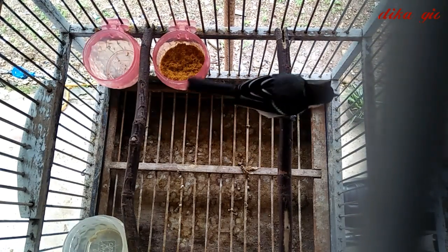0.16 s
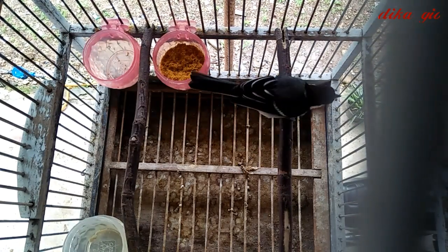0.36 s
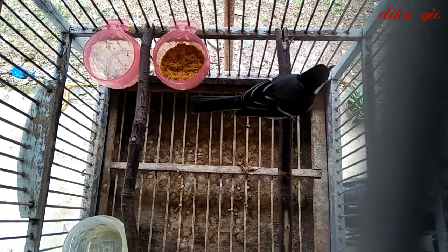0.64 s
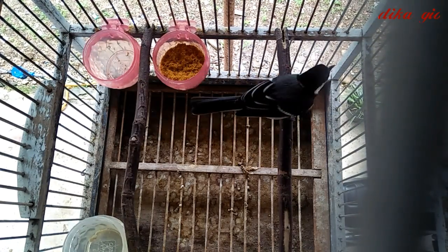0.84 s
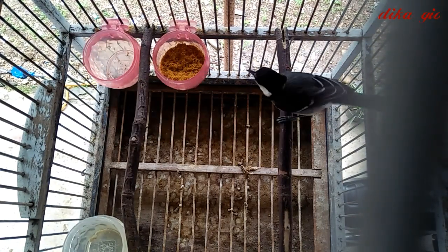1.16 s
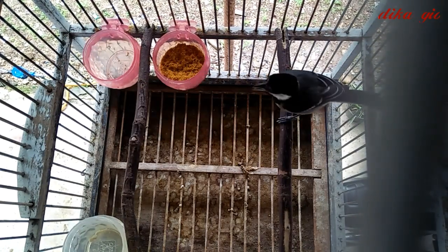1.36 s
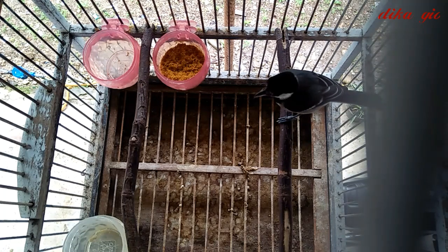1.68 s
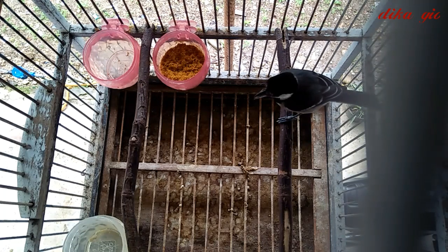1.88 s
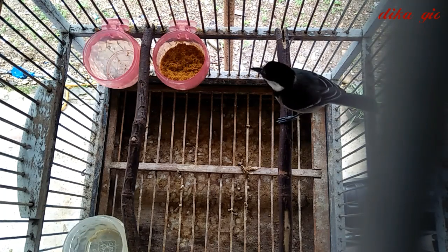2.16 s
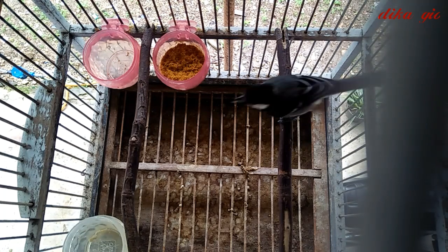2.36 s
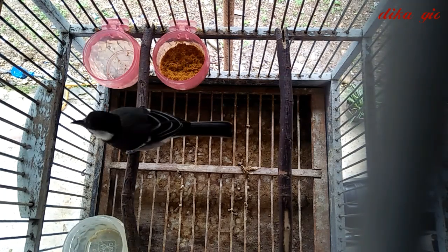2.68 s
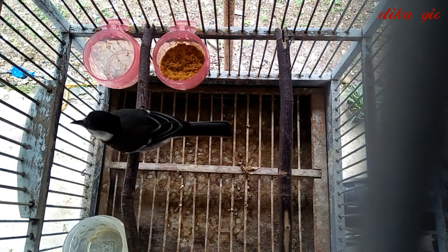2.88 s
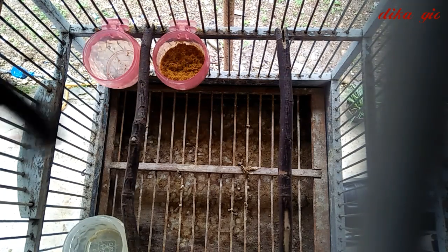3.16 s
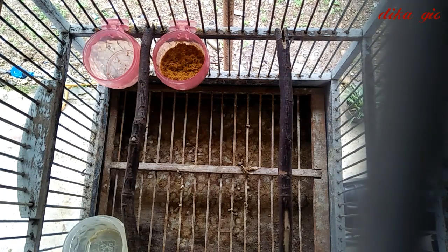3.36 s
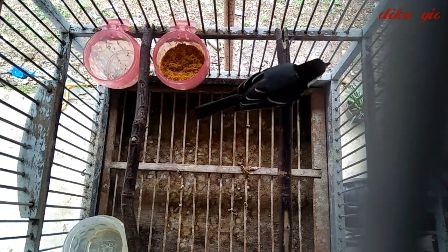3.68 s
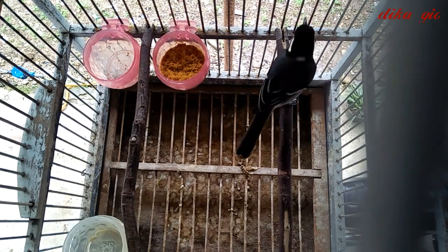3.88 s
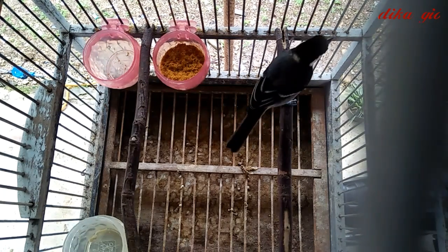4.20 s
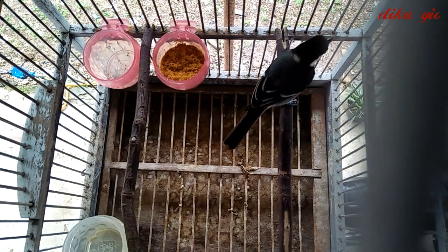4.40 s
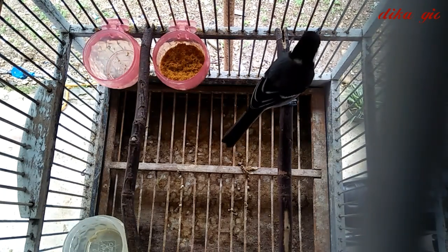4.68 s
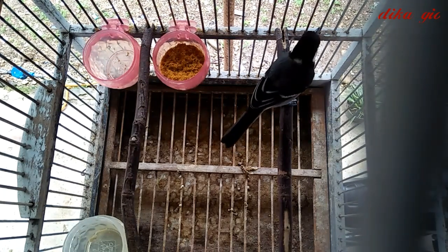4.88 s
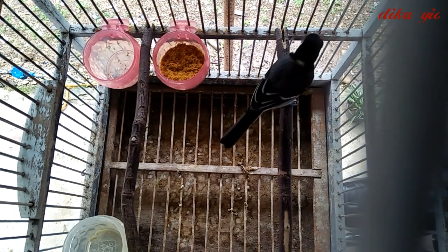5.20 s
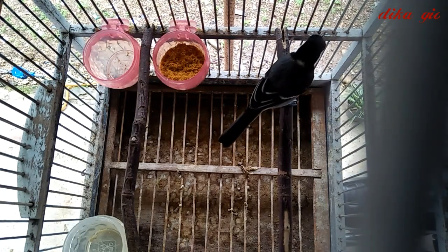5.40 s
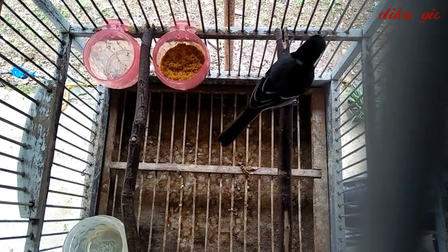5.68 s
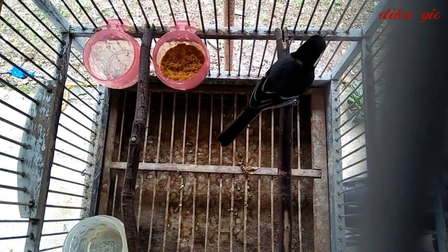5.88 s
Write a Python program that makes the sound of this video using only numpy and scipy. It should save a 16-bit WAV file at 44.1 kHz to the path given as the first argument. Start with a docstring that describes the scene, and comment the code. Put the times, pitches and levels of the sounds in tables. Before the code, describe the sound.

For the first 1.5 seconds there is only a faint murky bed of low rumble, dull wash and fluttering hiss, with soft hollow swells. At about 1.5 a small bird close by starts to sing loudly: a raspy onset into a slur rising from roughly 3.7 to 5 kHz, a thin whistle near 6 to 7 kHz at 1.75, two quick arched chips at 1.97 and 2.06, a sharp tick within the second, and another slur at 2.25. From 2.4 to 4.1 the quiet bed returns with faint ticks and hollow puffs. The second phrase begins at 4.15 with a thin whistle, then paired chips at 4.4, a raspy slur at 4.7, a softer-starting thin whistle at 4.9 and two last chips at 5.2 and 5.3. Notes leave a short ringing cage and room tail and faint mirror tones. Quiet hiss continues to 6.

```python
"""A small caged bird sings two phrases close by, its syrinx gliding near-sine whistles through three syllables:
a low slur that opens with a rasp, a thin high whistle, and a pair of arched chips that open with short rasps.
Reflections off the cage and room give the song a slightly ringing tail.
Shaped noise gives a faint murky background of rumble, dull wash and hiss, with soft hollow swells, sharp ticks
and brief fading bursts of hiss. Rate conversion by dropping samples puts faint mirror tones around every whistle."""
import sys
import numpy as np
from scipy import signal
from scipy.io import wavfile
from scipy.ndimage import uniform_filter1d, map_coordinates

SR = 44100
rng = np.random.default_rng(int(sys.argv[2]) if len(sys.argv) > 2 else 0)


def dump_mix(stems):
    """Bounce the given channels to the path in sys.argv[1] as a 16-bit WAV at rate SR."""
    frames = np.atleast_2d(stems).T  # one column per channel
    limited = np.clip(frames, -1, 1)  # hard clip at full scale
    pcm = np.round(limited * 32767).astype(np.int16)
    wavfile.write(sys.argv[1], SR, pcm)


N = 266628
TIME = np.arange(N) / SR


def from_db(db):
    """Logarithmic level: decibels become an amplitude ratio."""
    return 10 ** (np.asarray(db) / 20)


def rms_one(x):
    """Normalisation: scale to a root-mean-square of 1."""
    return x / np.sqrt(np.mean(x ** 2) + 1e-20)


def in_time(rows, t=TIME):
    """Linear interpolation: each column of a curve, joined by straight lines."""
    s, *columns = np.transpose(rows)
    return [np.interp(t, np.sort(s), column) for column in columns]


def slow_gain(stretches, gain_db):
    """Amplitude envelope: one gain curve through the level points of all stretches."""
    return from_db(gain_db + in_time(np.concatenate(stretches))[0])


def drift(rate, size=N):
    """Band-limited random modulation: a smooth wander through `rate` random knots per second, spread near 1."""
    knots = rng.standard_normal(4096)
    return map_coordinates(knots, [np.arange(size) * rate / SR], order=3, mode="wrap")


def resonance(x, hz, width_hz):
    """Damped resonance: a two-pole band-pass with gain 1 on top."""
    radius = np.exp(-np.pi * width_hz / SR)
    numerator = np.array([1, 0, -1]) * (1 - radius * radius) / 2
    denominator = [1, -2 * radius * np.cos(2 * np.pi * hz / SR), radius * radius]
    return signal.lfilter(numerator, denominator, x)


def band_pass(x, low_hz, high_hz):
    """Band limitation: a Butterworth band-pass."""
    edges = [low_hz, min(high_hz, SR * .45)]
    return signal.sosfilt(signal.butter(2, edges, "band", fs=SR, output="sos"), x)


def add(track, start_s, sound):
    """Superposition: mix a sound into the track at a given time."""
    i = round(start_s * SR)
    track[i:i + len(sound)] += sound[:N - i]


def banded_noise(spectrum, patchy_db, flicker_rate):
    """Subtractive synthesis: twelve bands of noise, each flickering on its own; rms 1."""
    hz, db = np.transpose(spectrum)
    edges = np.geomspace(max(hz[0], 15), min(hz[-1], SR * .45), 13)
    white, out = rng.standard_normal((2, N)), 0
    for k, (low, high) in enumerate(zip(edges, edges[1:])):
        band = band_pass(white[k % 2], low, high)  # neighbours use different noise
        level_db = np.interp(np.log(low * high) / 2, np.log(hz), db)
        out = out + band * from_db(level_db + patchy_db * drift(flicker_rate))
    return rms_one(out)


# spectral density of the rumble: (frequency [Hz], relative density [dB per Hz])
RUMBLE_SPECTRUM = [(22, -23), (40, -19), (60, -3), (100, -8), (135, -4.5), (180, -1), (240, -8.5), (300, 0),
                   (380, -17)]
# envelope before, between and after the phrases: (time [s], level before the trim [dB])
RUMBLE_ENVELOPE = [
    [(0.0, -68.5), (0.31, -70.5), (0.644, -63.5), (1.3, -64)],
    [(2.45, -72.5), (3.016, -70), (3.128, -66), (4.12, -71.5)],
    [(5.4, -65.5), (5.75, -73), (6.046, -70)],
]
RUMBLE_TRIM_DB = 4


def rumble():
    """Low-frequency coloured noise under a level envelope."""
    return slow_gain(RUMBLE_ENVELOPE, RUMBLE_TRIM_DB) * banded_noise(RUMBLE_SPECTRUM, patchy_db=3.5, flicker_rate=33)


# spectral density of the dull wash: (frequency [Hz], relative density [dB per Hz])
WASH_SPECTRUM = [(330, -15), (420, -1), (580, 4), (720, -0.5), (930, 3), (1250, -4), (1600, -4.5),
                 (2100, -4), (2800, -12)]
# envelope before, between and after the phrases: (time [s], level before trim and low-pass [dB])
WASH_ENVELOPE = [
    [(0.0, -57.5), (0.378, -58.5), (0.778, -59), (1.48, -57.5)],
    [(2.45, -58.5), (2.65, -59), (2.952, -59.5), (3.31, -61), (4.12, -57.5)],
    [(5.4, -55.5), (5.658, -61), (5.916, -62.5), (6.046, -57.5)],
]
WASH_TRIM_DB, WASH_EDGE_HZ = 1.5, 2324


def wash():
    """Mid-frequency coloured noise, dulled by a low-pass filter."""
    noise = slow_gain(WASH_ENVELOPE, WASH_TRIM_DB) * banded_noise(WASH_SPECTRUM, patchy_db=2.6, flicker_rate=22)
    return signal.sosfilt(signal.butter(4, WASH_EDGE_HZ, fs=SR, output="sos"), noise)


# spectral density of the hiss: (frequency [Hz], relative density [dB per Hz])
HISS_SPECTRUM = [(1760, -21), (3000, 4.5), (4920, -3.5), (6430, -4.5), (8010, 1.5), (13000, -2),
                 (13900, -0.5), (15500, -20.5)]
# envelope by which it swells and sinks: (time [s], level before the trim [dB])
HISS_ENVELOPE = [
    [(0.0, -67.5), (0.136, -79.5), (0.21, -66), (0.338, -80.5), (0.51, -72), (0.676, -82), (0.7, -68.5),
     (0.746, -78.5), (1.48, -68)],
    [(2.55, -68.5), (2.946, -75.5), (2.986, -84.5), (3.27, -88.5), (3.288, -72.5), (3.568, -83.5),
     (3.722, -67.5), (4.098, -75.5), (4.12, -74.5)],
    [(5.5, -72.5), (5.606, -69.5), (5.71, -86), (5.848, -90), (5.858, -73.5), (5.93, -71), (5.962, -78.5),
     (5.98, -67), (6.046, -75)],
]
HISS_TRIM_DB = 2


def hiss():
    """High-frequency coloured noise under a swelling and sinking envelope."""
    return slow_gain(HISS_ENVELOPE, HISS_TRIM_DB) * banded_noise(HISS_SPECTRUM, patchy_db=1.4, flicker_rate=40)


# soft hollow swells: (time [s], half length [s], centre frequency [Hz], peak level [dB])
HOLLOW_SWELLS = [(0.243, 0.041, 624, -55), (0.49, 0.022, 490, -52), (0.577, 0.029, 587, -49.5),
                 (0.87, .05, 170, -63), (1.108, 0.042, 565, -52), (1.2, .04, 174, -59.5),
                 (1.4, .065, 213, -52), (1.405, .05, 940, -54), (2.591, 0.076, 834, -54),
                 (3.022, 0.045, 600, -52.5), (3.28, .014, 73.4, -59.5), (3.328, 0.057, 206, -58)]


def swells(spread):
    """Narrow-band noise under a Gaussian envelope, which rises and sinks softly."""
    out = np.zeros(N)
    for peak_s, half_s, hz, level_db in HOLLOW_SWELLS:
        noise = rms_one(band_pass(rng.standard_normal(N), hz / (1 + spread), hz * (1 + spread)))
        out += from_db(level_db) * noise * np.exp(-.5 * ((TIME - peak_s) / half_s) ** 2)
    return out


# sharp ticks and brief fading bursts of hiss:
# (time [s], starting level [dB], decay time to 1/e [s], reference frequency just below the band [Hz])
TICK_BURSTS = [(2.068, -12, 0.0015, 5210), (2.072, -18.5, 0.0024, 5140), (1.27, -66, .04, 11540),
               (1.405, -67, .04, 4200), (2.734, -55.5, 0.0058, 6640), (2.91, -71, 0.022, 5730),
               (3.286, -65.5, 0.032, 3220)]


def ticks():
    """Impulsive excitation: a burst of band noise with exponential decay."""
    out, t = np.zeros(N), TIME[:SR // 5]
    for start_s, level_db, decay_s, hz in TICK_BURSTS:
        burst = rms_one(band_pass(rng.standard_normal(len(t)), hz / 0.96, hz * 1.216))
        add(out, start_s, from_db(level_db) * burst * np.exp(-t / decay_s))
    return out


# resonances of the throat and beak: (frequency [Hz], width [Hz], relative gain [dB])
THROAT_RESONANCES = [(4050, 3600, 13), (5000, 900, -2), (7000, 1100, -13.5)]


def rasp(length_s, first_hz, last_hz, level_db, jitter, breath_db, swell_db):
    """Source-filter principle: before a whistle locks in, uneven syrinx pulses and breath ring the throat."""
    progress = np.linspace(0, 1, round(length_s * SR))
    hz = (first_hz + (last_hz - first_hz) * progress) * (1 + jitter * drift(400, size=len(progress)))
    phase = 2 * np.pi * np.cumsum(hz) / SR
    pulses = rms_one(sum(np.cos(k * phase) for k in range(2, 7)))  # harmonics 2 to 6
    air = from_db(breath_db) * rng.standard_normal(4096)[:len(progress)]
    source = pulses + air
    voice = sum(from_db(db) * resonance(source, f, width) for f, width, db in THROAT_RESONANCES)
    swell = from_db(swell_db * progress) * np.sin(np.pi * progress)
    return from_db(level_db) * rms_one(voice * swell)


def throat_band(x):
    """Band limitation of the rasps."""
    return band_pass(x, low_hz=2720, high_hz=6640)


# low slurs: (start [s], length [s], opening pitch [Hz], closing pitch [Hz], top pitch [Hz], bend of the climb [1],
# time of the step [s], step [Hz], hook length [s], hook pitch [Hz], rasp length [s], rasp level before the band [dB])
LOW_SLURS = [(1.545, .128, 3684, 4276, 5476, 1.4, 1.561, 288.4, .017, 4654, .043, -40),
             (2.259, .132, 3468, 4454, 5355, 0.76, 2.281, 340, .020, 4780, 0.036, -35.5),
             (4.690, .130, 3325, 4237, 5240, 3.2, 4.747, 129.7, .023, 4380, .042, -34.5)]
# pulse rate (first, last) and how far the rasp runs into the note
SLUR_RASP_HZ, SLUR_RASP_OVERLAP_S = (1258, 1500), 0.0066


def slur_rasps():
    """Pulsed phonation: a long rasp opens every slur."""
    out = np.zeros(N)
    for start_s, *_, hook_s, _, rasp_s, level_db in LOW_SLURS:
        buzz = rasp(rasp_s, *SLUR_RASP_HZ, level_db, jitter=.04, breath_db=0, swell_db=13)
        add(out, start_s - hook_s + SLUR_RASP_OVERLAP_S - rasp_s, buzz)
    return throat_band(out)


# every note leaps up from a low pitch and drops after its top
LEAP_FROM_HZ, SLUR_LEAP_FROM_HZ = 2700, 2900
FALL_HZ_PER_S, FALL_S = 200000, .013


def sweep(t, from_hz, length_s, opening_hz, closing_hz, top_hz, bend, leap_s, flick_s):
    """Frequency modulation: leap up, climb (levelling off if the bend is over 1), flick to the top, drop away."""
    held = np.clip(t, 0, length_s)
    climb = closing_hz - (closing_hz - opening_hz) * (1 - held / length_s) ** bend
    leap = (from_hz - opening_hz) * np.exp(-(held / leap_s) ** 2)
    flick = (top_hz - closing_hz) * np.exp((held - length_s) / flick_s)
    return climb + leap + flick - FALL_HZ_PER_S * np.maximum(t - length_s, 0)


# knots per second of the pitch waver; glide speed at which a whistle turns rough (Hz per s)
WAVER_PER_S, ROUGH_GLIDE = 110, 80000


def whistle(hz, level_db, waver_hz, jitter, overtone_db, overtone_limit_db, rough_db):
    """Self-sustained oscillation: a near sine, rough in fast glides, whose octave saturates as it gets loud."""
    t = TIME[:len(hz)]
    hz = uniform_filter1d(hz, size=66, mode="nearest")
    glide_hz_per_s = np.abs(np.gradient(hz)) * SR
    unrest = np.tanh(glide_hz_per_s / ROUGH_GLIDE)
    hz = hz + waver_hz * drift(WAVER_PER_S, size=len(t))
    hz = hz * (1 + jitter * (.15 + unrest) * drift(700, size=len(t)))
    level_db = level_db + rough_db * unrest * (drift(600, size=len(t)) - .3)
    phase = 2 * np.pi * np.cumsum(hz) / SR
    octave_db = np.minimum(level_db + overtone_db, overtone_limit_db)
    tone = from_db(level_db) * np.sin(phase) + from_db(octave_db) * np.sin(2 * phase)
    fade = np.clip(np.minimum(t, t[-1] - t) / .002, 0, 1)
    return np.sqrt(2) * tone * fade  # a sine at 0 dB has rms 1


# loudness through each slur: (time [s], level before trim and hook softening [dB])
SLUR_ENVELOPES = [
    [(1.529, -31), (1.533, -28.5), (1.559, -29), (1.569, -22.5), (1.595, -23), (1.609, -29.5), (1.669, -27),
     (1.681, -32)],
    [(2.241, -32), (2.247, -22.5), (2.263, -32), (2.285, -24.5), (2.295, -32), (2.321, -27), (2.387, -26.5),
     (2.4, -32)],
    [(4.668, -29.5), (4.68, -24), (4.746, -28), (4.754, -20.5), (4.798, -26.5), (4.824, -31.5),
     (4.828, -44)],
]
# quickness of the small upward step; how much softer the hook is than the whistle after it
STEP_S, HOOK_SOFTER_DB = .004, 3


def slurs(gain_db):
    """Frequency glide: a quick hook up and down, then a long low whistle that rises with one small step."""
    out = np.zeros(N)
    for slur, levels in zip(LOW_SLURS, SLUR_ENVELOPES):
        start_s, length_s, *shape, step_at_s, step_hz, hook_s, hook_hz, _, _ = slur
        t = np.arange(-hook_s, length_s + FALL_S / 2, 1 / SR)
        hook_arch = np.abs(np.sin(np.pi * np.clip(-t / hook_s, 0, 1) ** 1.25)) ** .8
        hook = (hook_hz - SLUR_LEAP_FROM_HZ) * hook_arch
        before_step = np.clip(t / STEP_S, 0, 1) * (1 - np.tanh((start_s + t - step_at_s) / STEP_S)) / 2
        glide = sweep(t, SLUR_LEAP_FROM_HZ, length_s, *shape, leap_s=.005, flick_s=.009)
        hz = hook + glide - step_hz * before_step
        level_db = gain_db + in_time(levels, start_s + t)[0] - HOOK_SOFTER_DB * hook / hook.max()
        note = whistle(hz, level_db, waver_hz=28, jitter=.005,
                       overtone_db=-34.5, overtone_limit_db=-62.0, rough_db=5.5)
        add(out, start_s - hook_s, note)
    return out


# thin whistles: (start [s], length [s], opening pitch [Hz], closing pitch [Hz], top pitch [Hz], bend of the climb [1])
THIN_WHISTLES = [(1.746, 0.13, 5900, 6640, 7700, 2.6), (4.144, 0.15, 6234, 6790, 7740, 1.55),
                 (4.92, .149, 6510, 6830, 7600, 2.5)]
# loudness through each thin whistle: (time [s], level before the trim [dB])
THIN_ENVELOPES = [
    [(1.747, -43), (1.757, -20), (1.765, -21.5), (1.843, -37.5), (1.863, -20), (1.882, -41)],
    [(4.146, -46), (4.154, -31), (4.232, -37), (4.24, -29), (4.272, -35), (4.294, -26.5), (4.305, -37.5)],
    [(4.925, -52), (4.931, -39), (4.983, -30.5), (4.993, -37.5), (5.013, -30.5), (5.019, -44), (5.061, -20),
     (5.085, -48)],
]
# the second thin whistle catches once: (time [s], half length [s], pitch drop [Hz])
PITCH_CATCH = (4.219, 0.0031, 620)


def high_whistles(gain_db):
    """Harmonic tone: a leap to a thin, gently climbing whistle with a faint octave."""
    out = np.zeros(N)
    catch_s, half_s, drop_hz = PITCH_CATCH
    for (start_s, length_s, *shape), levels in zip(THIN_WHISTLES, THIN_ENVELOPES):
        t = np.arange(0, length_s + FALL_S, 1 / SR)
        catch = drop_hz * np.exp(-.5 * ((start_s + t - catch_s) / half_s) ** 2)
        hz = sweep(t, LEAP_FROM_HZ, length_s, *shape, leap_s=.0075, flick_s=0.0061) - catch
        level_db = gain_db + in_time(levels, start_s + t)[0]
        note = whistle(hz, level_db, waver_hz=55, jitter=0.0077,
                       overtone_db=-8.0, overtone_limit_db=-47, rough_db=6.5)
        add(out, start_s, note)
    return out


# arched chips, in pairs: (start [s], length [s], opening pitch [Hz], closing pitch [Hz], top pitch [Hz],
# bend of the climb [1], level before the envelope [dB], rasp level before the band [dB])
ARCHED_CHIPS = [(1.972, 0.04, 4935, 6324, 6510, 1.63, -20, -38.5),
                (2.059, 0.041, 4570, 6100, 6740, 1.22, -21, -33),
                (4.402, 0.042, 4803, 6220, 6290, 1.6, -21, -35),
                (4.488, 0.042, 4980, 5970, 6490, 1.14, -22, -30.5),
                (5.216, .037, 4633, 6310, 6940, 1.1, -22, -35.5),
                (5.305, .034, 5120, 5540, 6376, 1.44, -22, -33)]
# pulse rate (first, last), how far the rasp runs into the chip, and its length
CHIP_RASP_HZ, CHIP_RASP_OVERLAP_S, CHIP_RASP_S = (1683, 2311), .005, .021


def chip_rasps():
    """Pulsed phonation: a short breathy rasp opens every chip."""
    out = np.zeros(N)
    for start_s, *_, level_db in ARCHED_CHIPS:
        buzz = rasp(CHIP_RASP_S, *CHIP_RASP_HZ, level_db, jitter=.045, breath_db=0, swell_db=13)
        add(out, start_s + CHIP_RASP_OVERLAP_S - CHIP_RASP_S, buzz)
    return throat_band(out)


# a chip swells, holds while growing a little, eases at its top and fades as it drops
CHIP_ATTACK_S, CHIP_ATTACK_DB, CHIP_GROWTH_DB_PER_S, CHIP_FADE_DB_PER_S = .011, 15, 49.5, 1200.5
CHIP_EASE_DB, CHIP_EASE_S = 5, 0.0046


def chips():
    """Rapid frequency modulation: short loud arches, the same sweep hurried."""
    out = np.zeros(N)
    for start_s, length_s, *shape, db, _ in ARCHED_CHIPS:
        t = np.arange(0, length_s + FALL_S, 1 / SR)
        hz = sweep(t, LEAP_FROM_HZ, length_s, *shape, leap_s=.008, flick_s=0.0037)
        attack_db = CHIP_ATTACK_DB * np.maximum(1 - t / CHIP_ATTACK_S, 0)
        ease_db = CHIP_EASE_DB * np.exp(-((t - length_s) / CHIP_EASE_S) ** 2)
        fade_db = CHIP_FADE_DB_PER_S * np.maximum(t - length_s, 0)
        level_db = db + CHIP_GROWTH_DB_PER_S * (t - length_s) - attack_db - ease_db - fade_db
        note = whistle(hz, level_db, waver_hz=60, jitter=.022,
                       overtone_db=-33, overtone_limit_db=-61.5, rough_db=3.5)
        add(out, start_s, note)
    return out


def beak(x, edge_hz=3050):
    """Radiation efficiency: the beak radiates poorly below its edge, so each leap starts weakly."""
    return signal.sosfilt(signal.butter(6, edge_hz, "high", fs=SR, output="sos"), x)


# pitches that the path through the cage cancels or lifts: (frequency [Hz], width [Hz], nominal gain [dB])
CAGE_INTERFERENCE = [(2790, 250, -6), (3685, 69, -10.5), (4960, 110, -4.5), (5625, 94, -7),
                     (6110, 240, 2.5), (6358, 170, -5)]


def cage_colour(x):
    """Interference: near walls cancel some pitches and lift others, so glides flutter as they cross them."""
    for hz, width_hz, db in CAGE_INTERFERENCE:
        x = x + (from_db(db) - 1) * resonance(x, hz, width_hz)
    return x


def echoes(x, t60_s, build_s):
    """Diffuse reverberation: dense random reflections that build up and die away; unit energy."""
    t = TIME[:SR]
    tail = rng.standard_normal(SR) * from_db(-60 * t / t60_s) * (1 - np.exp(-t / build_s))
    return signal.fftconvolve(x, tail / np.linalg.norm(tail))[:N]


# decay time by 60 dB, and level
CAGE_T60_S, CAGE_DB = .08, -9.5
ROOM_T60_S, ROOM_DB = 0.26, -16.5


def room(x):
    """Reverberation: quick reflections from bars and tray make glides beat; the room's tail follows each note."""
    cage = from_db(CAGE_DB) * echoes(x, CAGE_T60_S, build_s=.002)
    tail = from_db(ROOM_DB) * echoes(x, ROOM_T60_S, build_s=0.022)
    return x + cage + tail


def scene():
    """Superposition of the bird in its room and the background."""
    background = rumble() + wash() + hiss() + swells(spread=0.273)
    whistles = slurs(gain_db=.3) + high_whistles(gain_db=-1.26) + chips()
    song = beak(whistles) + slur_rasps() + chip_rasps()
    return (room(cage_colour(song) + ticks()) + background)[None]


def record(dry):
    """Aliasing: 48 kHz sound thinned by dropping samples gains mirror tones 3.9 kHz apart; the top is cut."""
    fast = signal.resample_poly(dry, 160, 147, axis=1)
    thinned = fast[:, np.arange(N) * 160 // 147]
    cutoff_hz = 15650
    return signal.sosfilt(signal.ellip(12, .1, 90, cutoff_hz, fs=SR, output="sos"), thinned)


dry = scene()
out = record(dry)
dump_mix(out)
```